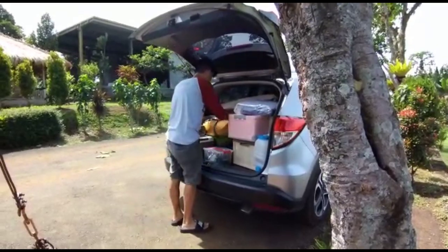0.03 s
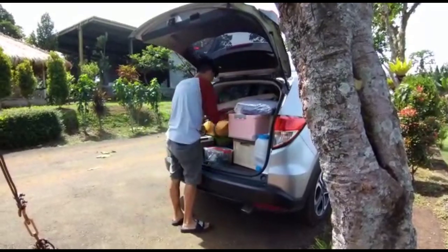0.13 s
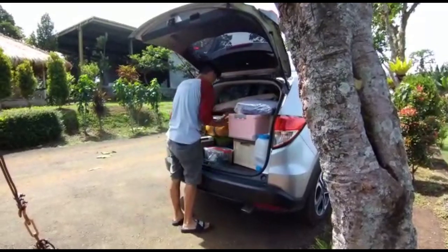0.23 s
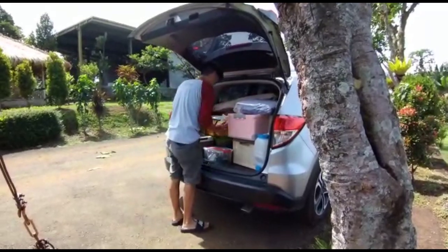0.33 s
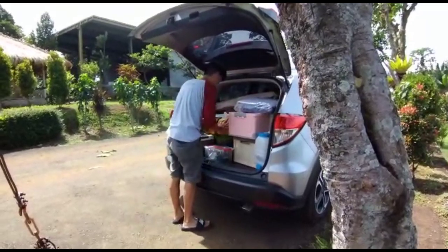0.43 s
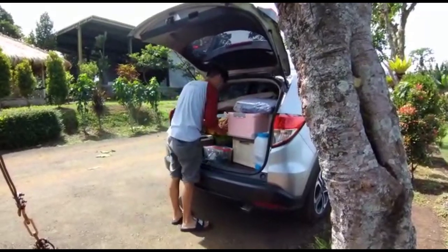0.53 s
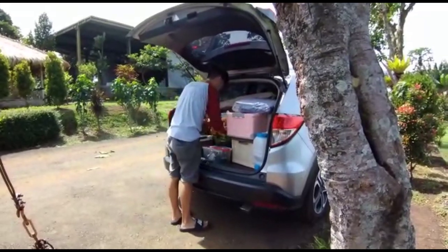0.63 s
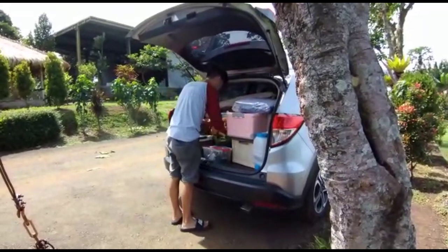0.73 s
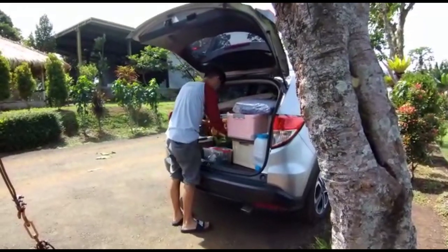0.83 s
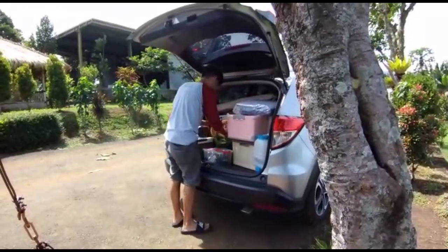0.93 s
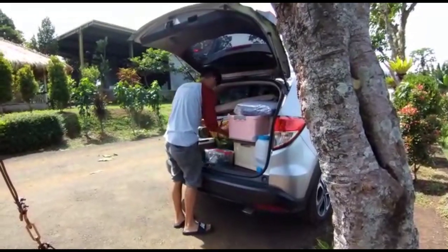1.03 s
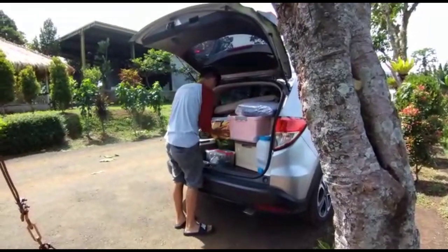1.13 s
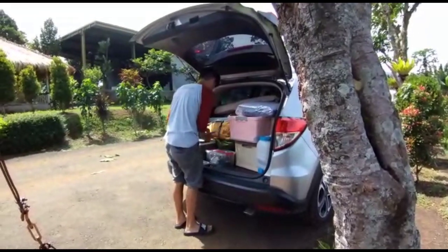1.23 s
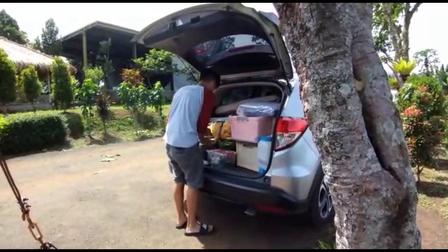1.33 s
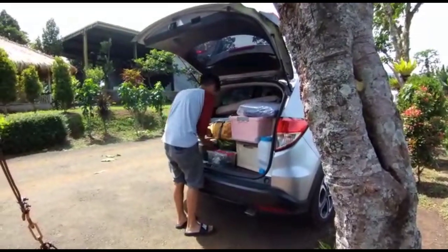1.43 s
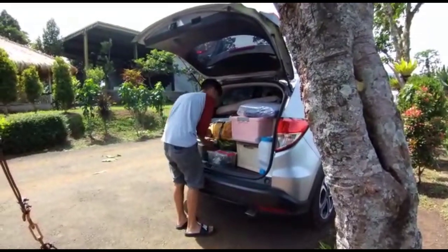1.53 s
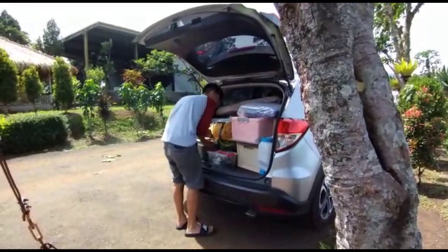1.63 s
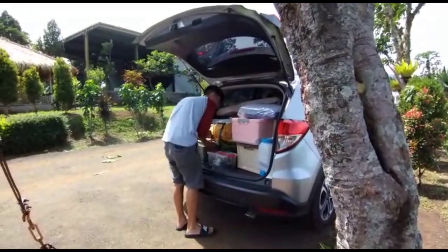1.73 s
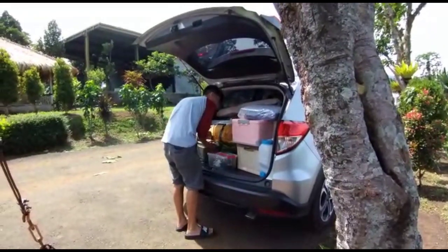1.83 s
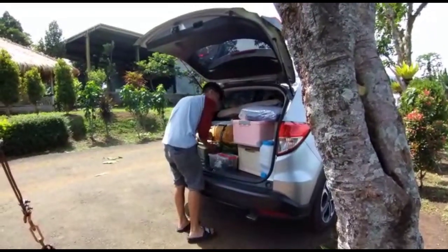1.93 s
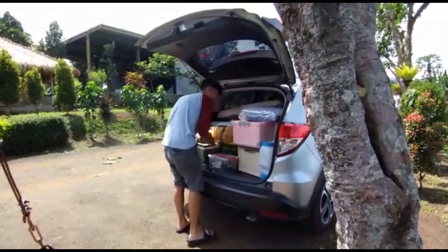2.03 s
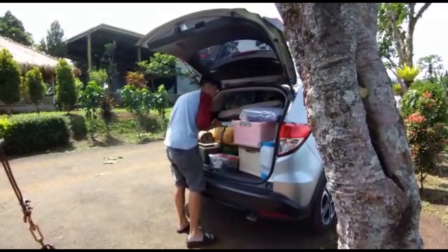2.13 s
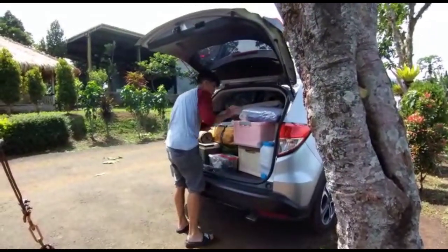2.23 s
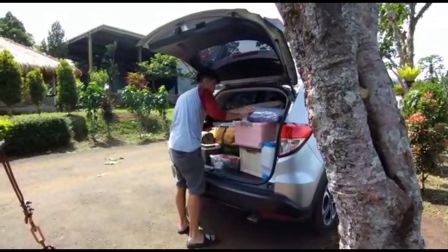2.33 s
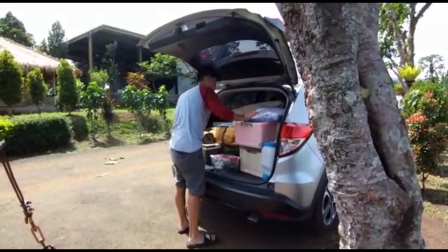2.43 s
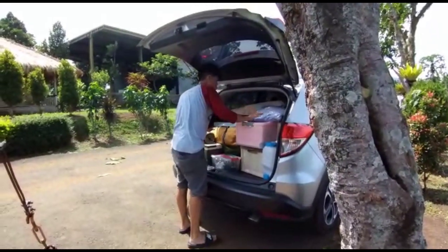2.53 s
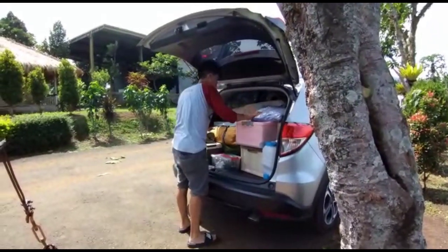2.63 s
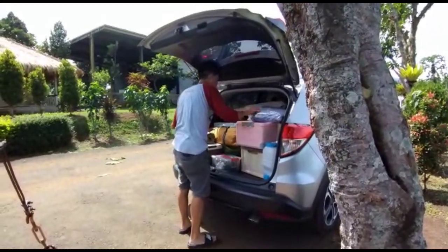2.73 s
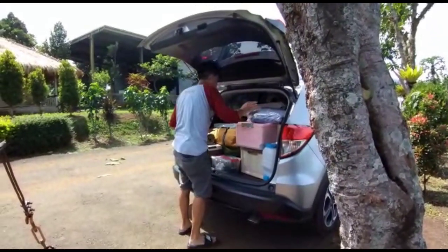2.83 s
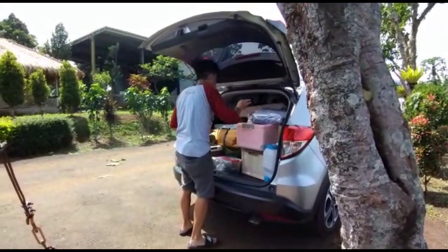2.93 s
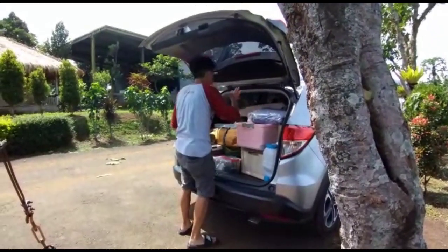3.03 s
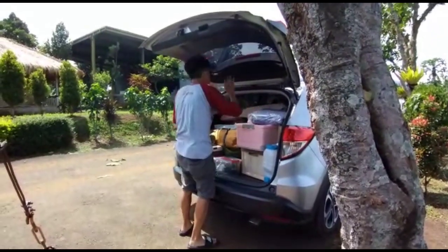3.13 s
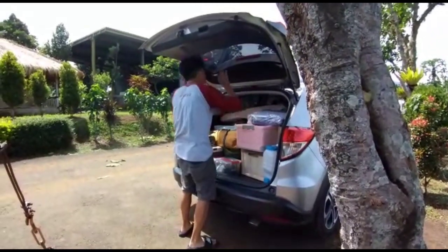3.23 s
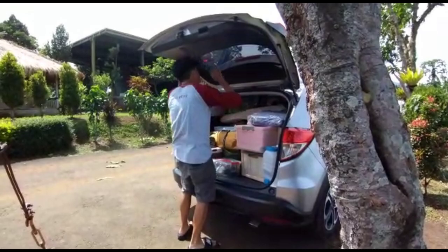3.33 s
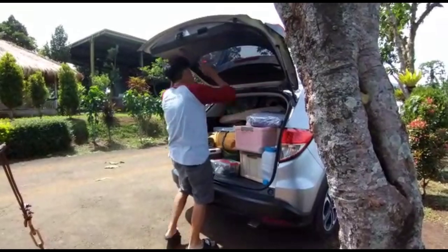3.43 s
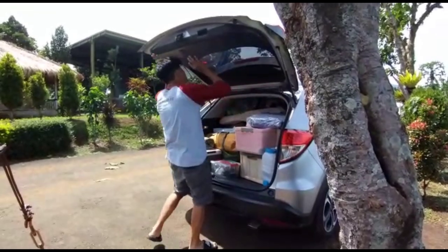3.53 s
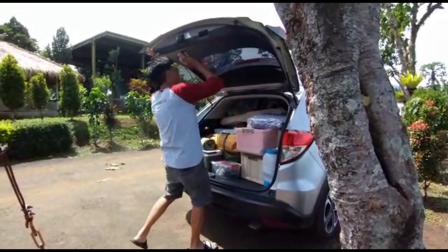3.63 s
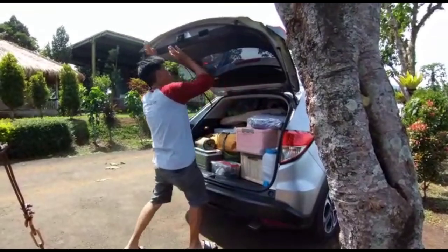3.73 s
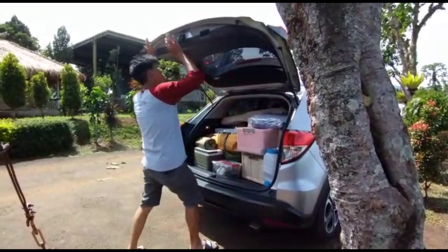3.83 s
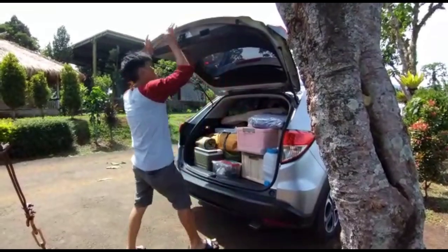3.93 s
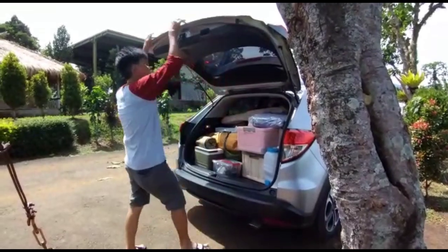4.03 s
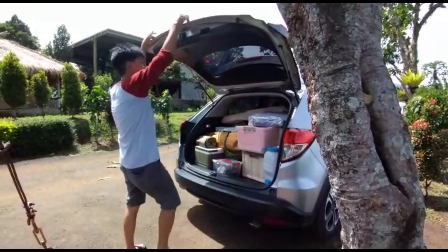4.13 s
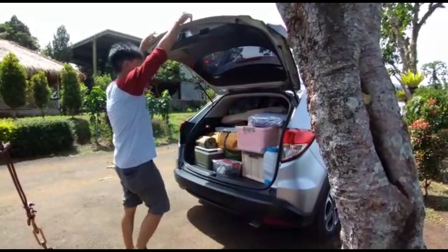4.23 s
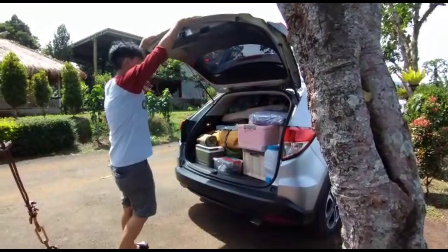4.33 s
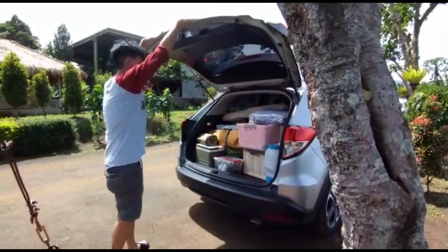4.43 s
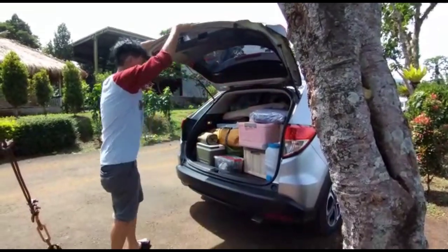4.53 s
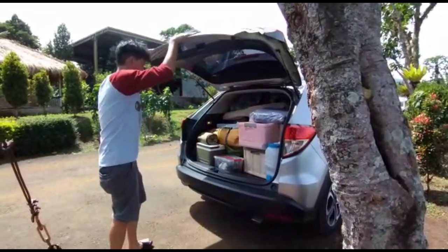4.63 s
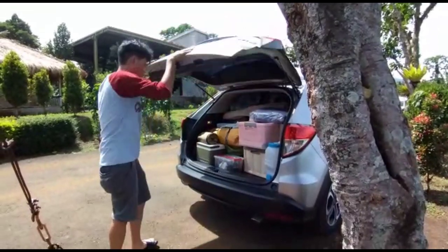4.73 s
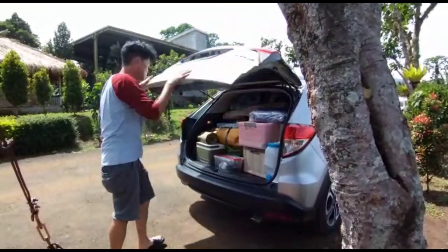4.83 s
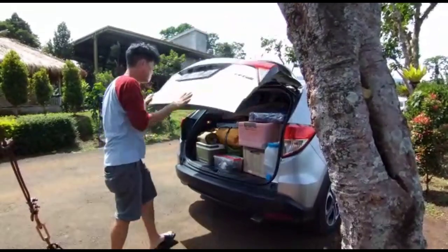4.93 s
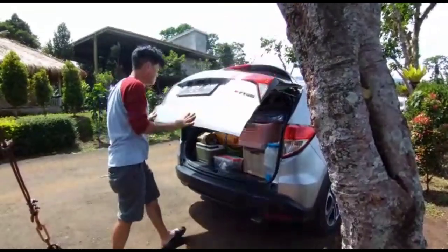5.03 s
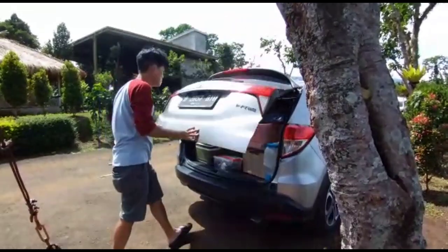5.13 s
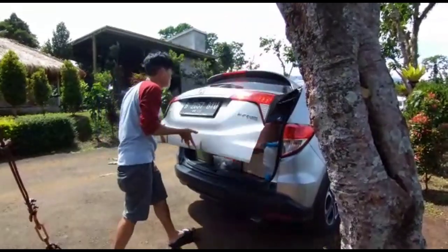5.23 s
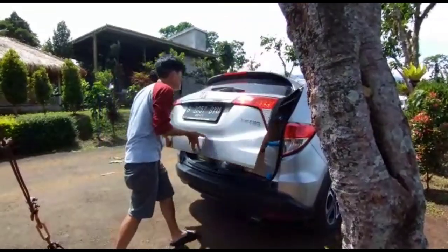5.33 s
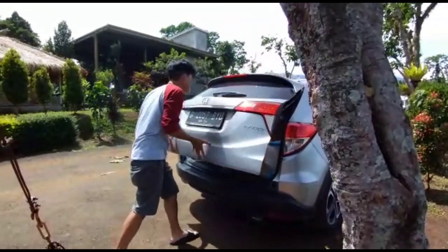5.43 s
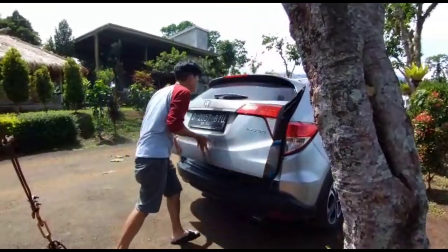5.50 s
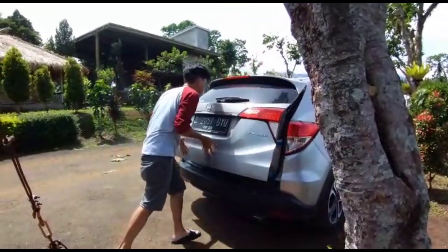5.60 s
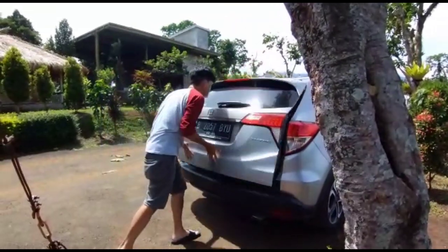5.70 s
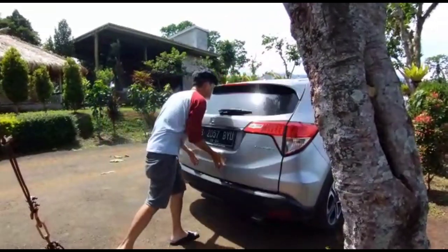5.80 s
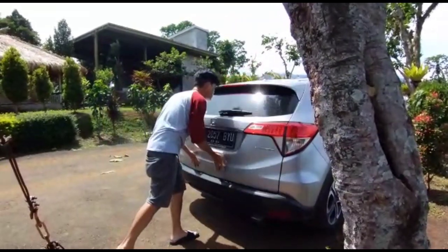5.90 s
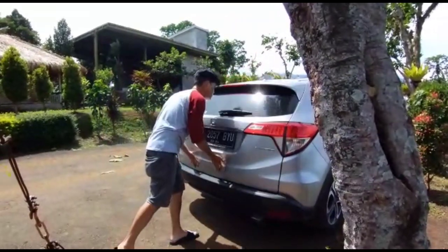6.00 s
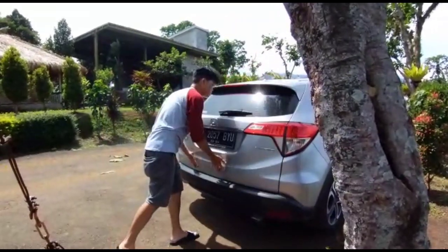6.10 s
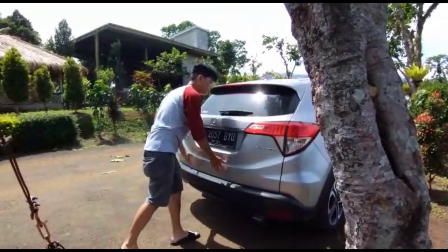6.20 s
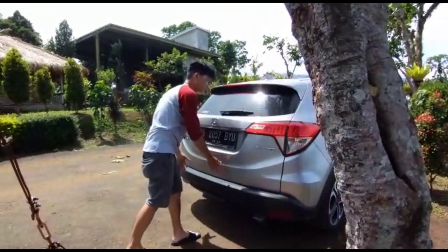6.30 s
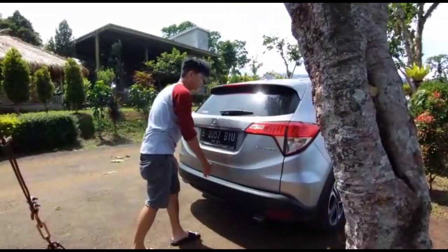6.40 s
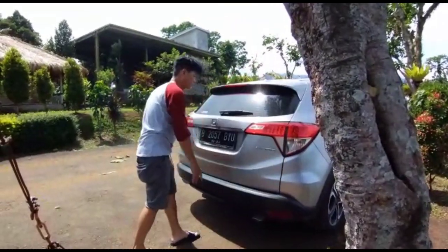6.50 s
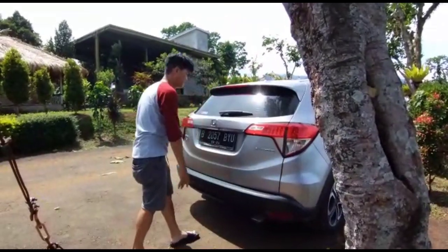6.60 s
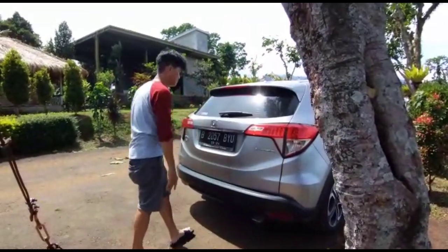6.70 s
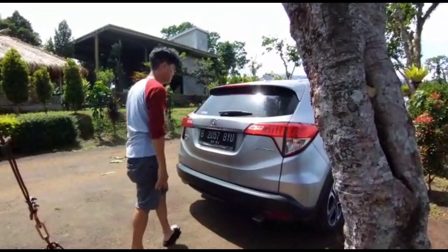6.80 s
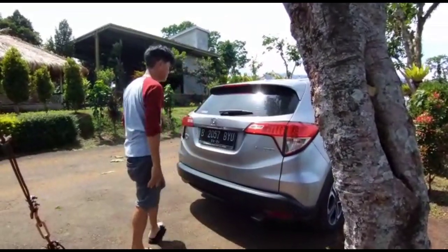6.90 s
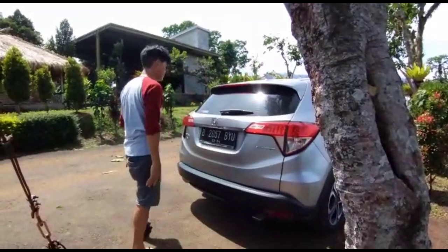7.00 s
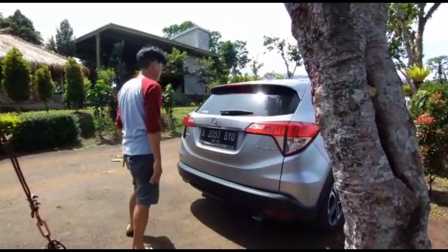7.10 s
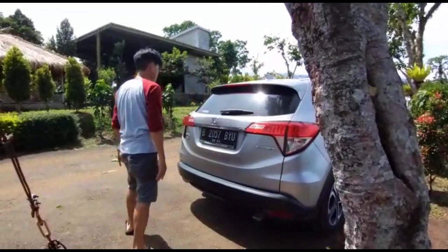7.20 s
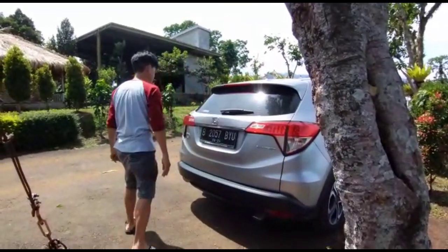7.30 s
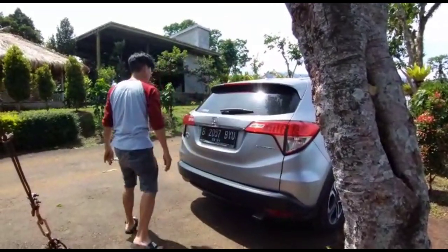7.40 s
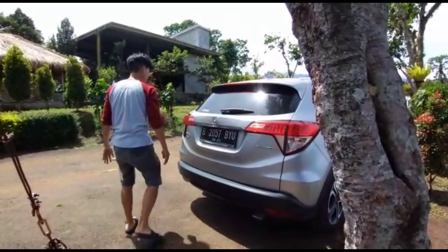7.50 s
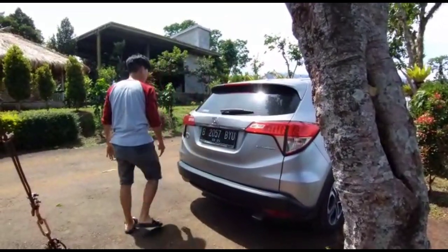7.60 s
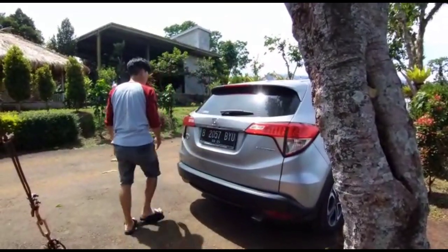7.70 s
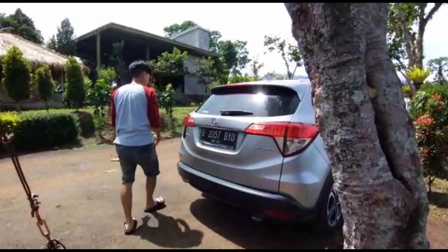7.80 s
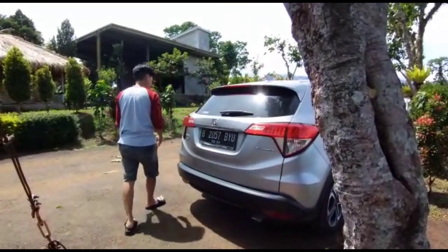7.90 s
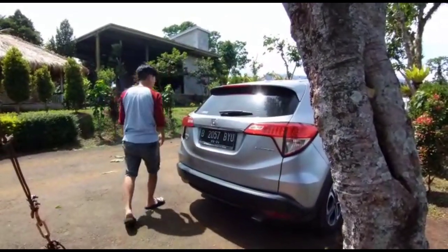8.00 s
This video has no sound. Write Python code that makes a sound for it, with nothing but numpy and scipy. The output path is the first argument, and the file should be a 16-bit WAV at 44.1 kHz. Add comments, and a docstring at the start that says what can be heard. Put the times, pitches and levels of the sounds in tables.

```python
"""First come soft knocks and scuffs, with birds whistling and light wind puffing on the microphone.
At a quiet campsite a man shifts luggage in a car's boot, his sandals scuffing the dirt. He steps back
and slams the tailgate: the panel thumps, the latch clacks, the cabin air booms and loose trim rattles.
Traffic rumbles far away. In the tables, fade_s is the time a sound takes to drop by 60 dB, side_db is
left minus right, and likeness runs from 0 (left and right unrelated) to 1 (the same)."""
import sys
import numpy as np
from scipy import signal
from scipy.fft import rfft, irfft, next_fast_len
from scipy.io import wavfile
from scipy.ndimage import map_coordinates

SR = 44100
rng = np.random.default_rng(int(sys.argv[2]) if len(sys.argv) > 2 else 0)


def generate_wav(signal):
    """Clip the signal to [-1, 1] and save it as 16-bit WAV at the path in sys.argv[1]."""
    frames = np.transpose(np.atleast_2d(signal))
    scaled = np.clip(frames, -1, 1) * 32767
    pcm = np.round(scaled).astype(np.int16)
    wavfile.write(sys.argv[1], SR, pcm)


N = 355049


# the gate lands on its seal, hits the latch and shudders to rest: start_s, thump_db, clack_db
GATE_BLOWS = [(5.869, -24.5, -36), (5.874, -25, -18), (5.878, -27.5, -34), (5.884, -29, -30),
              (5.906, -32, -31.5), (5.9207, -27.5, -32), (5.945, -31, -34), (5.960, -33.5, -31.5),
              (6.038, -44, -42)]
# ringing notes of the latch and sheet steel: pitch_hz, level_db, fade_s
STEEL_NOTES = [(619, -28, 0.31), (727, -36, 0.17), (840, -27, 0.17), (1038, -17, 0.11), (1120, -3.5, 0.021),
               (1118, -14.5, 0.098), (1220, -9, 0.026), (1350, -18, 0.054), (1610, -20.5, 0.043),
               (1840, -22, 0.2), (1915, -17, 0.073), (2274, -23, 0.17), (2720, -39, 0.095)]
# tone of a hard tick, also used for the knocks: pitch_hz, level_db
TICK_TONE = [(200, 2), (700, 3.5), (1200, 0), (2000, 2.5), (3200, -4.5), (5000, -1.5), (7500, -27),
             (15000, -21)]

def tailgate():
    """Each blow thumps the panel and rings the steel, while the cabin booms and the trim rattles."""
    out, t = cabin_boom(), np.arange(SR // 4) / SR
    for start_s, thump_db, clack_db in GATE_BLOWS:
        steel = ring(STEEL_NOTES, t, detune=0.004) * rise(t, 0.00097)
        tick = amp(-18.5) * clatter(TICK_TONE, t, fade_s=0.089, grain_db=-0.5)
        add(out, start_s, amp(thump_db) * panel_thump(t) + amp(clack_db) * (steel + tick))
    return out + trim_rattle()


# the gate panel's strongest notes: pitch_hz, level_db, fade_s
PANEL_NOTES = [(172, -10, 0.14), (194.5, -9, .2), (225, -17, 0.2), (281, -4, 0.16), (299, 0.5, 0.14),
               (316, -3, 0.15), (340, -5, 0.15), (371, -2, 0.13), (411, -19, 0.16), (431, -10, 0.18)]
# its many weaker notes, blurred into a thud: pitch_hz, level_db
THUD_TONE = [(120, -11), (200, 0.5), (300, -2), (400, 2.5), (500, -18), (800, -10.5), (1500, -16.5),
             (4000, -40), (9000, -80)]

def panel_thump(t):
    """The struck panel shakes; the rubber seal softens the start."""
    thud = clatter(THUD_TONE, t, fade_s=0.17, grain_db=0)
    return (amp(-8.5) * ring(PANEL_NOTES, t) + amp(-6.5) * thud) * rise(t, 0.0024)


# the gate pushes air as it lands and as it bounces on the latch: start_s, level_db
AIR_PUSHES = [(5.873, -24), (5.890, -21.5), (5.956, -27)]
# deep notes of the cabin air and the car's springs: pitch_hz, level_db, fade_s
CABIN_NOTES = [(35.3, -12.5, 0.26), (60, -21, 0.17), (78.7, -5, 0.16), (93.4, -2, 0.11), (124, -6.5, 0.05),
               (123.3, -26.5, 0.87)]

def cabin_boom():
    """Air trapped behind the closing gate booms."""
    out, t = np.zeros((2, N)), np.arange(SR) / SR
    for start_s, level_db in AIR_PUSHES:
        add(out, start_s, amp(level_db) * ring(CABIN_NOTES, t) * rise(t, 0.0028))
    return out


# the trim hits the gate: start_s, level_db, fade_s, brighten_db_per_octave
TRIM_HITS = [(5.876, -33.5, 0.18, -3.5), (5.892, -42.5, 0.11, 7), (5.921, -35, 0.12, 0.5),
             (5.961, -31.5, .11, 1), (5.974, -32, 0.052, 3.5), (6.016, -44, 0.071, 2),
             (6.036, -37, 0.078, 1), (6.120, -43.5, .06, -2), (6.189, -47.5, 0.065, -0.5),
             (6.243, -55, 0.11, -5)]
# tone of rattling hard plastic: pitch_hz, level_db
PLASTIC_TONE = [(200, -1), (700, -8), (1400, 0), (2300, 4), (3800, 1), (5500, -4.5), (8000, -14),
                (12000, -8.5), (15500, -16)]
# the trim's own ringing notes: pitch_hz, level_db, fade_s
TRIM_NOTES = [(894, -10, 0.12), (1666, -5, 0.093), (2314, -5.5, .1), (2480, -9.5, 0.12), (3670, -13, 0.15)]

def trim_rattle():
    """Each shudder throws the loose trim against the gate, which shakes the panel a little too."""
    out, t = np.zeros((2, N)), np.arange(SR // 4) / SR
    for start_s, level_db, fade_s, brighten_db in TRIM_HITS:
        for delay_s, touch_db in [(-.0145, -6.5), (0, 0), (.012, -8)]:  # graze, hit, bounce
            rattle = clatter(PLASTIC_TONE, t, fade_s, grain_db=0.67, brighten_db=brighten_db)
            rattle += amp(-5.5) * ring(TRIM_NOTES, t, detune=0.0191)
            rattle += amp(-14.5) * panel_thump(t)
            add(out, start_s + delay_s, amp(level_db + touch_db) * rattle)
    return out


# bumps of luggage, hands and gate struts: start_s, level_db, pitch_hz, tick_db, second_tap_db
LIGHT_KNOCKS = [(.027, -50.5, 427, -53.5, -14), (.608, -60, 350, -51, 0), (0.646, -47, 383, -42, -12),
                (0.73, -47.5, 447, -50, -22), (1.764, -47, 254, -66, -8), (1.9313, -44, 414, -66, -7),
                (4.428, -42, 312, -55, -9), (4.475, -43, 216, -71, -11), (5.365, -48, 423, -62, 0),
                (5.385, -47.5, 425, -61, 0), (7.152, -48, 187, -66, -14), (7.694, -54, 164, -64, -19)]

def knocks():
    """A bumped thing gives a short, dull note and a tick, then settles with a second tap."""
    out, t = np.zeros((2, N)), np.arange(SR // 5) / SR
    for start_s, level_db, pitch_hz, tick_db, second_tap_db in LIGHT_KNOCKS:
        fade_s = 15.4 / pitch_hz  # gone in about 15 vibrations
        for delay_s, tap_db in [(0, 0), (.0235, second_tap_db)]:
            hollow = ring([(pitch_hz, 0, fade_s), (pitch_hz * 2.1, -11, fade_s)], t, detune=0.012)
            tick = clatter(TICK_TONE, t, fade_s=0.078, grain_db=4.5)
            add(out, start_s + delay_s, amp(tap_db) * (amp(level_db) * hollow + amp(tick_db) * tick))
    return out


# sandals and bags rubbing: middle_s, length_s, level_db, side_db, squeak_hz, squeak_db
SCUFF_STROKES = [(0.669, .15, -58.5, -3, 1880, -4.5), (1.768, 0.12, -57.5, -1, 714, -6.5),
                 (2.402, 0.086, -59.5, -7, 4860, -2.5), (2.469, .12, -64.5, -11, 4830, 3),
                 (2.523, .12, -63.5, -1, 1660, -6.5), (4.439, 0.14, -68.5, 3, 1290, -3),
                 (6.797, .1, -63.5, 0, 2580, 3), (6.872, 0.046, -62, 5.5, 2540, -2),
                 (7.876, 0.11, -69.5, -1, 2600, 1)]
# tone of grinding grit: pitch_hz, level_db
GRIT_TONE = [(150, -10), (400, 8), (1000, 1), (2500, 1.5), (5000, 3.5), (8000, -12), (12000, -2),
             (15500, -10.5)]

def scuffs():
    """Grit grinds under a stroke that swells and fades; the rubbed thing adds a breathy squeak."""
    out, t = np.zeros((2, N)), np.arange(SR // 2) / SR
    for middle_s, length_s, level_db, side_db, hz, squeak_db in SCUFF_STROKES:
        stroke = np.sin(np.pi * np.minimum(t / length_s, 1))
        grains = unit_level(amp(2.6 * drift(len(t), per_s=398.3)))
        squeak_tone = [(hz / 2, -35), (hz / 1.25, -10), (hz, 0), (hz * 1.31, -10), (hz * 2, -40)]
        squeak = amp(squeak_db) * noise(squeak_tone, NEAR_LIKENESS, len(t))
        rub = noise(GRIT_TONE, NEAR_LIKENESS, len(t)) + squeak
        add(out, middle_s - length_s / 2, amp(level_db) * pan(side_db) * stroke * grains * rub)
    return out


# the held whistle in each song: start_s, length_s, pitch_hz, level_db, side_db
BIRD_SONGS = [(0.12, 0.21, 3490, -67, -4), (0.869, .21, 3467, -65, -2.5), (2.17, 0.23, 3420, -71, 9),
              (3.452, 0.22, 3440, -67, -3), (4.973, .212, 3380, -67, 7), (7.004, 0.26, 3346, -67, 3)]
# short notes around it: start_in_whistle_lengths, length_s, from_hz, to_hz, level_db
SHORT_NOTES = [(-.22, 0.0302, 2950, 4390, -7.5), (1.23, .035, 5100, 4870, -5.5),
               (1.476, .036, 4900, 2765, -4)]

def songbird():
    """One bird repeats its song: a flick up, a held whistle, a high pip and a flick down."""
    out = np.zeros((2, N))
    for start_s, length_s, pitch_hz, level_db, side_db in BIRD_SONGS:
        t = np.arange(0, length_s, 1 / SR)
        progress = t / length_s
        scoop_up = -.25 * np.exp(-t / .014)
        slow_sag = 0.0213 * (.75 - progress)
        swell_db = 8 * (progress - 1.07)
        dip_db = -3 * np.exp(-((progress - .45) / 0.22) ** 2)
        soft_ends = np.minimum(np.minimum(t, length_s - t) / 0.0064, 1)
        held = amp(swell_db + dip_db) * soft_ends * whistle(pitch_hz * (1 + scoop_up + slow_sag))
        gain = pan(side_db) * amp(level_db)
        add(out, start_s, gain * held)
        for place, note_s, from_hz, to_hz, note_db in SHORT_NOTES:
            add(out, start_s + place * length_s, gain * amp(note_db) * chirp(note_s, from_hz, to_hz))
    return out


# the clearest calls of other birds: start_s, length_s, from_hz, to_hz, level_db, side_db
BIRD_CHIRPS = [(0.129, 0.11, 4810, 4030, -77, -12), (1.113, 0.1, 4800, 4000, -68.5, -11),
               (1.541, 0.013, 4280, 3650, -64, -4), (2.184, 0.083, 4900, 3930, -74, -13),
               (2.852, 0.167, 2670, 2580, -81.5, 0), (2.997, 0.035, 5830, 5050, -70, -8),
               (3.282, 0.13, 4780, 3920, -74.5, -8), (3.59, 0.012, 3660, 4150, -64, -4),
               (4.842, 0.12, 3740, 4160, -70.5, 1)]
TWITTER_UNTIL_S, TWITTER_HZ, TWITTER_S, TWITTER_DB = 4.2, 4470, 0.029, -75.5

def other_birds():
    """Scattered chirps, and a faint random twitter from the trees on the right."""
    out = np.zeros((2, N))
    for start_s, length_s, from_hz, to_hz, level_db, side_db in BIRD_CHIRPS:
        add(out, start_s, pan(side_db) * amp(level_db) * chirp(length_s, from_hz, to_hz))
    for when, length, first, last in rng.random(size=(22, 4)):
        from_hz, to_hz = TWITTER_HZ * (1 + 0.26 * (np.array([first, last]) - .5))
        note = chirp(TWITTER_S * (.5 + length), from_hz, to_hz)
        add(out, when * TWITTER_UNTIL_S, pan(side_db=-15) * amp(TWITTER_DB) * note)
    return out


def chirp(length_s, from_hz, to_hz):
    """A bird's short, wavering slide between two pitches."""
    size = int(length_s * SR)
    return signal.windows.tukey(size, .5) * whistle(np.geomspace(from_hz, to_hz, size), waver=0.02)


def whistle(hz, waver=0.0034):
    """A bird's nearly pure tone; fast slides come out rougher than held notes."""
    slide = np.minimum(abs(np.gradient(np.log(hz))) * SR / 8, 1)
    wobble = waver * drift(len(hz), per_s=159) + 0.0296 * slide * drift(len(hz), per_s=900)
    cycles = np.cumsum(hz * (1 + wobble)) / SR
    return np.sqrt(2) * np.sin(2 * np.pi * cycles) * amp(2.4 * drift(len(hz), per_s=62))


# puffs of wind: peak_s, half_width_s, level_db, side_db
WIND_PUFFS = [(.2, 0.23, -57, -7.5), (.75, 0.14, -61.5, -4), (2.35, 0.13, -59, -7), (2.99, 0.1, -54, 13.5),
              (3.29, 0.078, -49.5, 9), (4.85, 0.24, -62.5, -6)]
# their low rumble: pitch_hz, level_db
WIND_TONE = [(12, -13), (35, -8.5), (75, 3.5), (140, -6.5), (300, -22.5), (1000, -58), (4000, -97)]
# how alike the wind is on both sides: pitch_hz, likeness
WIND_LIKENESS = [(30, 0.33), (300, 0.31)]

def wind():
    """Air buffets the microphone: a light breeze with puffs that swell and fade."""
    power = amp(-73.5) ** 2  # the steady breeze
    t = np.arange(N) / SR
    for peak_s, half_width_s, level_db, side_db in WIND_PUFFS:
        swell = np.exp(-.5 * ((t - peak_s) / half_width_s) ** 2)
        power = power + (amp(level_db) * pan(side_db) * swell) ** 2
    return np.sqrt(power) * noise(WIND_TONE, WIND_LIKENESS, next_fast_len(N))[:, :N]


# loudness of open air, a soft rustle, far traffic, and far birds and insects: time_s, level_db
AIR_LEVELS = [(0, -62), (1, -60.5), (3.7, -59.5), (6.6, -60.5), (8.05, -60)]
RUSTLE_LEVELS = [(0, -70.5), (3.4, -77.5), (4.3, -67.5), (5.5, -68.5), (7, -68.5), (8.05, -69.5)]
TRAFFIC_LEVELS = [(0, -62), (1.3, -61.5), (2.6, -63.5), (4, -72), (6.5, -73), (8, -72.5)]
CHORUS_LEVELS = [(0, -75), (1.1, -72), (2.5, -68.5), (3.9, -69), (4.3, -71.5), (6.5, -88), (7.7, -84),
                 (8.05, -65.5)]
# tone of the same four: pitch_hz, level_db
AIR_TONE = [(15, -43), (25, -16), (86, -6.5), (132, -3.5), (193, -10), (388, -13.5), (612, -20),
            (892, -24.5), (2830, -24.5), (3420, -25), (3710, -23), (4350, -24.5), (7660, -33.5),
            (12800, -29.5), (15400, -34.5)]
RUSTLE_TONE = [(300, -13.5), (800, 0), (1500, -5), (2200, -3), (3000, -9.5), (5000, -28), (9000, -28)]
TRAFFIC_TONE = [(70, -31), (110, -1.5), (135, 7), (165, -1.0), (240, -39)]
CHORUS_TONE = [(2500, -72), (3700, -9.5), (4400, -2.5), (5100, -7.5), (6200, -22), (8000, -20)]
# how alike far sounds are on both sides: pitch_hz, likeness
FAR_LIKENESS = [(50, 0.97), (130, 0.89), (300, 0.84), (640, 0.51), (1400, 0), (3000, 0)]

def outdoors():
    """Far sounds blur into four layers of noise, each slowly rising and falling."""
    def layer(levels, tone):
        level_db = np.interp(np.arange(N) / SR, *np.transpose(levels))
        return amp(level_db) * noise(tone, FAR_LIKENESS, next_fast_len(N))[:, :N]

    air = layer(AIR_LEVELS, AIR_TONE) * amp(.5 * drift(N, per_s=5.8))
    rustle = layer(RUSTLE_LEVELS, RUSTLE_TONE)
    traffic = layer(TRAFFIC_LEVELS, TRAFFIC_TONE)
    chorus = layer(CHORUS_LEVELS, CHORUS_TONE) * amp(0.65 * drift(N, per_s=14))
    return air + rustle + traffic + chorus


# how long the echoes last: pitch_hz, fade_s
ECHO_FADES = [(100, 0.85), (400, 0.66), (2000, 0.43), (6000, 0.96), (14000, 0.43)]

def echoes(sound):
    """Trees and buildings scatter thin echoes; each pitch dies away at its own speed."""
    taps = rng.standard_normal((2, SR)) * (rng.random((2, SR)) < 3000 / SR)
    taps[:, :SR // 100] = 0  # the first echo needs 10 ms to return
    hz, t, bands = signal.stft(taps, SR, nperseg=256)
    same = np.clip(look_up(FAR_LIKENESS, hz), -1, 1)[:, None]
    bands[1] = same * bands[0] + np.sqrt(1 - same ** 2) * bands[1]
    fade = amp(-60 * t / look_up(ECHO_FADES, hz)[:, None])
    tail = signal.istft(bands * fade, SR, nperseg=256)[1]
    return signal.fftconvolve(sound, tail / np.linalg.norm(tail[0]), axes=1)[:, :N]


# how alike near sounds are on both sides: pitch_hz, likeness
NEAR_LIKENESS = [(100, 0.99), (300, 1), (640, 0.88), (1400, 0.87), (3100, 0.41), (6500, 0.014)]

def clatter(tone, t, fade_s, grain_db, brighten_db=0):
    """Parts chatter as they touch: a burst of noise with a quick start and a grainy fade."""
    chatter = unit_level(amp(grain_db * drift(len(t), per_s=574)))
    tilted = [(hz, db + brighten_db * np.log2(hz)) for hz, db in tone]
    return noise(tilted, NEAR_LIKENESS, len(t)) * chatter * rise(t, 0.0013) * amp(-60 * t / fade_s)


def ring(notes, t, detune=0):
    """A struck thing's fading notes; detune shifts them, as each blow lands on a different spot."""
    out = 0
    for pitch_hz, level_db, fade_s in notes:
        pitch_hz *= 1 + detune * rng.standard_normal()
        out += amp(level_db - 60 * t / fade_s) * np.sin(2 * np.pi * pitch_hz * t)
    return out


def noise(tone, likeness, size):
    """Stereo noise shaped by a tone table and a likeness table."""
    hz = np.fft.rfftfreq(size, 1 / SR)
    left, other = rfft(rng.standard_normal((2, size)))
    same = np.clip(look_up(likeness, hz), -1, 1)
    right = same * left + np.sqrt(1 - same ** 2) * other
    return unit_level(irfft(np.array([left, right]) * amp(look_up(tone, hz)), size))


def drift(size, per_s):
    """A smooth wander through per_s random values a second."""
    values = rng.standard_normal(4096)
    return map_coordinates(values, [np.arange(size) * per_s / SR], order=2, mode="wrap")


def rise(t, rise_s):
    """A soft start, climbing from 0 towards 1."""
    return 1 - np.exp(-t / rise_s)


def amp(db):
    """Turns decibels into a gain."""
    return 10 ** (np.asarray(db) / 20)


def unit_level(x):
    """Scales to an average power of 1."""
    return x / np.sqrt(np.mean(x ** 2) + 1e-20)


def look_up(table, hz):
    """Reads between a table's rows, with octaves evenly spaced."""
    pitches, values = np.transpose(table)
    return np.interp(np.log(hz + 1), np.log(pitches + 1), values)


def pan(side_db):
    """Left and right gains."""
    return amp(np.array([[.5], [-.5]]) * side_db)


def add(mix, start_s, sound):
    """Mixes a sound in at start_s."""
    part = mix[:, max(round(start_s * SR), 0):][:, :sound.shape[-1]]
    part += sound[..., :part.shape[1]]


def scene():
    """Near sounds have little echo; the birds come through the trees with much more."""
    near = tailgate() + knocks() + scuffs()
    birds = songbird() + other_birds()
    return near + amp(2.0) * birds + echoes(amp(-19.5) * near + amp(-3.5) * birds) + outdoors() + wind()


# which side each pitch leans to at the microphone: pitch_hz, side_db
MIC_BALANCE = [(100, -0.5), (1200, 0), (2400, -2), (4400, -3.5), (6200, 12.5), (8100, 7), (10500, 3),
               (12500, 1), (15000, -3.5)]
TREBLE_LIMIT_HZ = 15550

def record(dry):
    """The microphone's two openings colour the treble differently; the very top is cut off."""
    size = next_fast_len(N)
    balance = pan(look_up(MIC_BALANCE, np.fft.rfftfreq(size, 1 / SR)))
    coloured = irfft(rfft(dry, size) * balance, size)[:, :N]
    treble_cut = signal.firwin(511, TREBLE_LIMIT_HZ, window=("kaiser", 9), fs=SR)
    return signal.oaconvolve(coloured, treble_cut[None], "same")


dry = scene()
out = record(dry)
generate_wav(out)
```